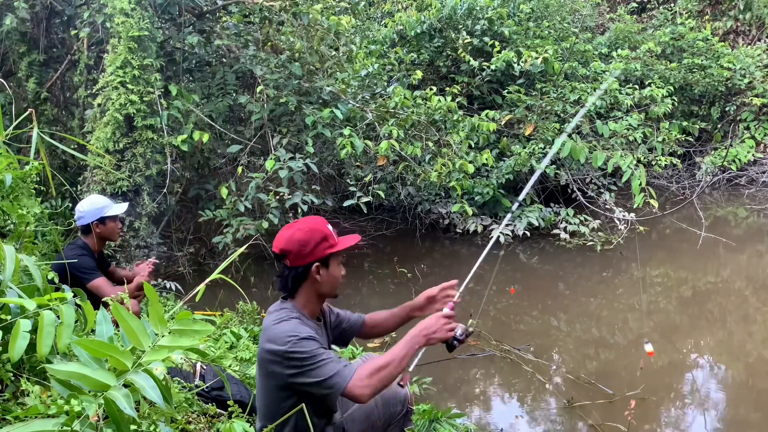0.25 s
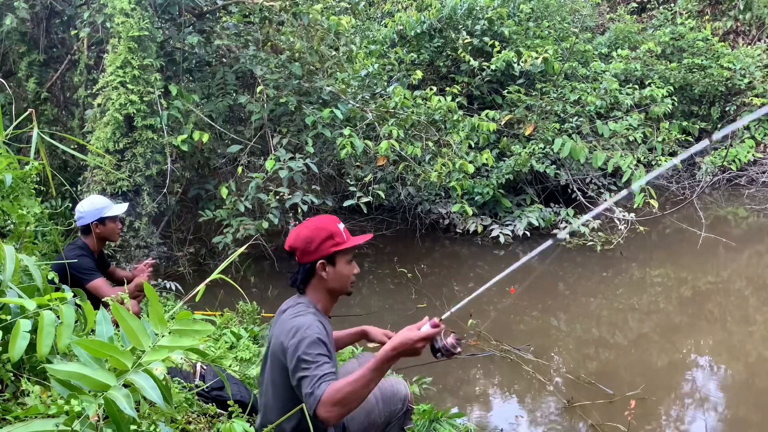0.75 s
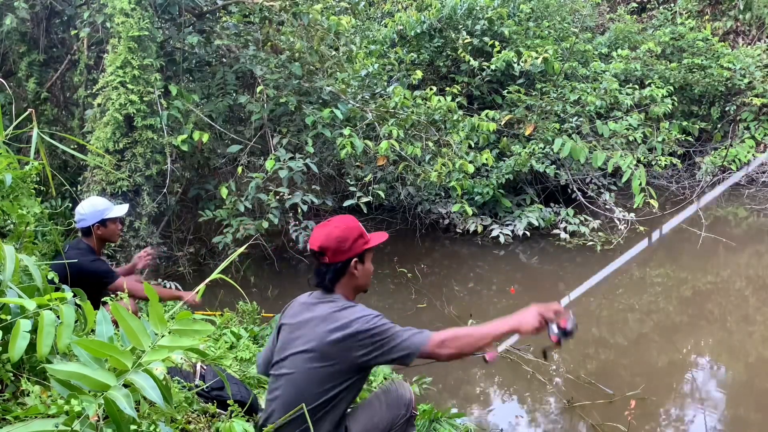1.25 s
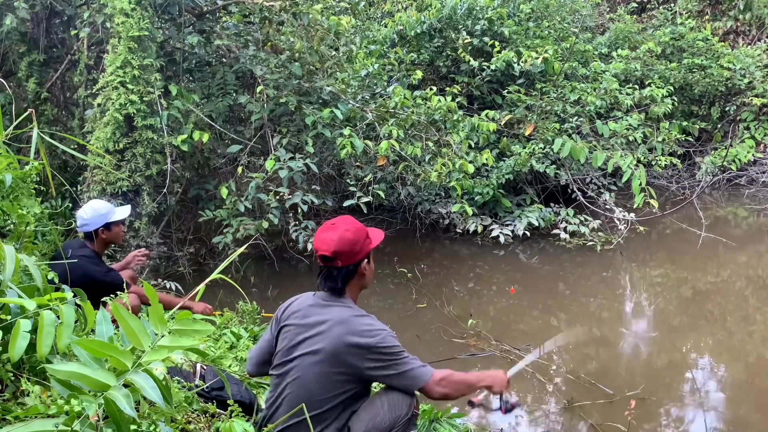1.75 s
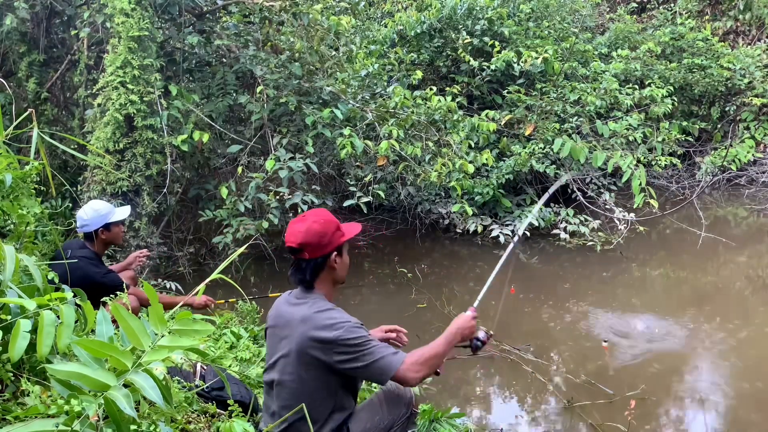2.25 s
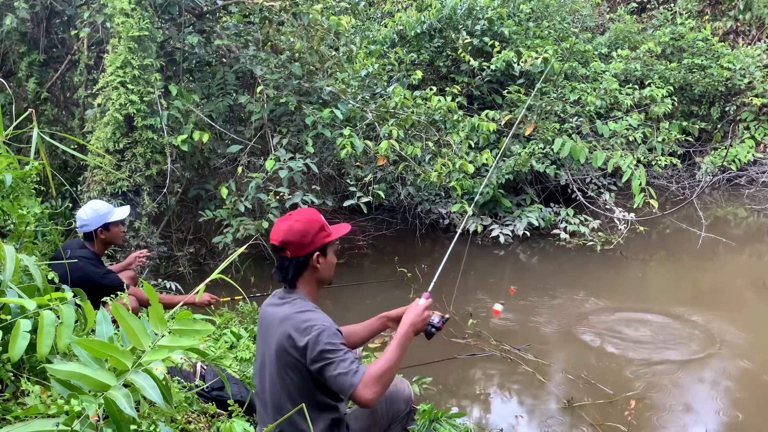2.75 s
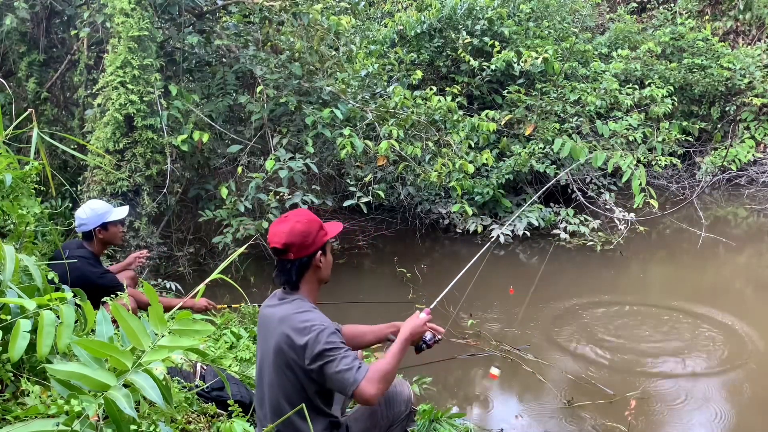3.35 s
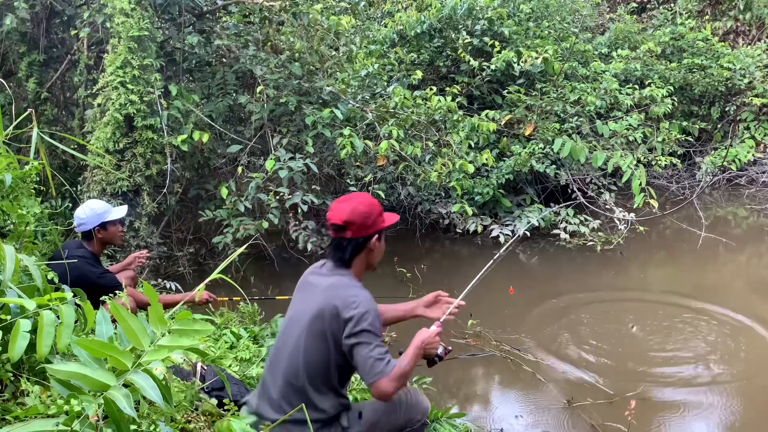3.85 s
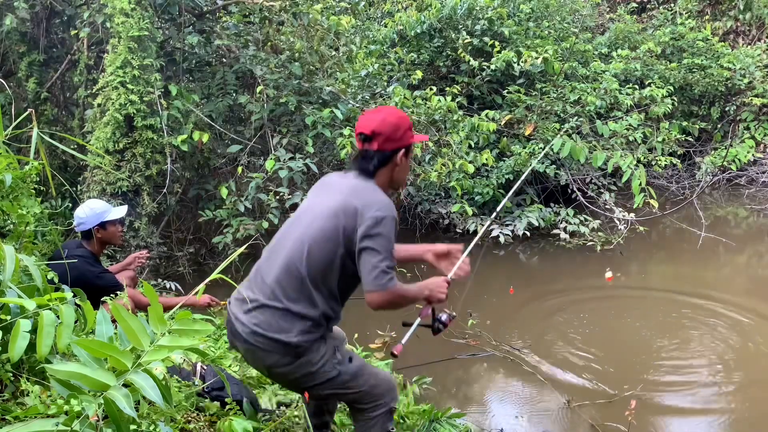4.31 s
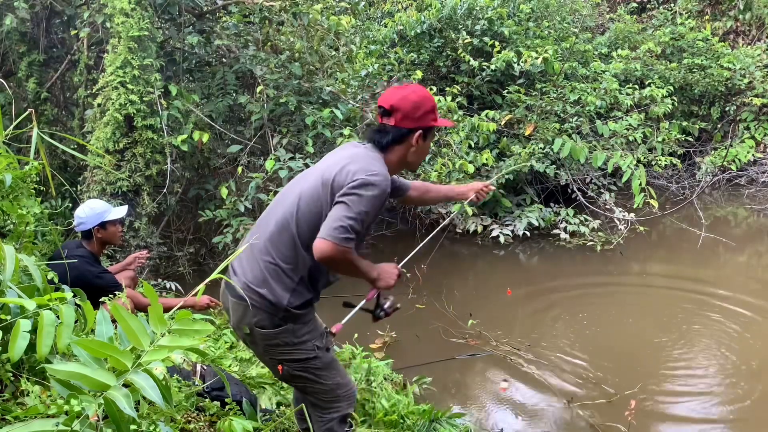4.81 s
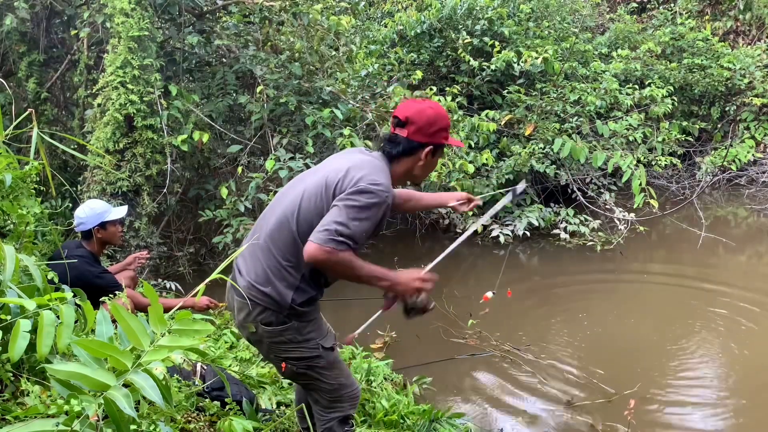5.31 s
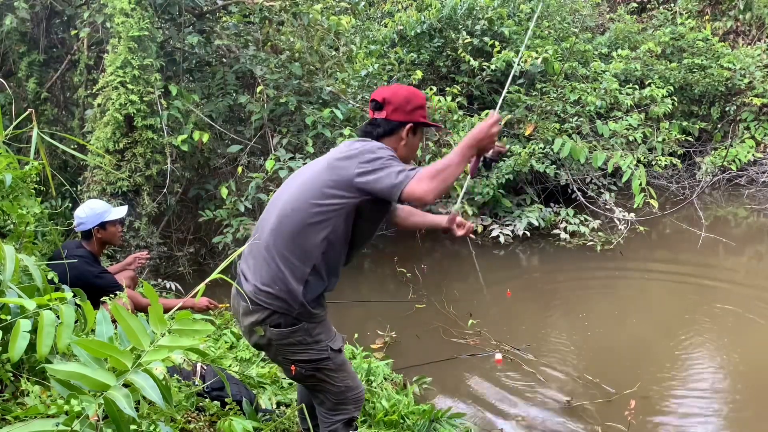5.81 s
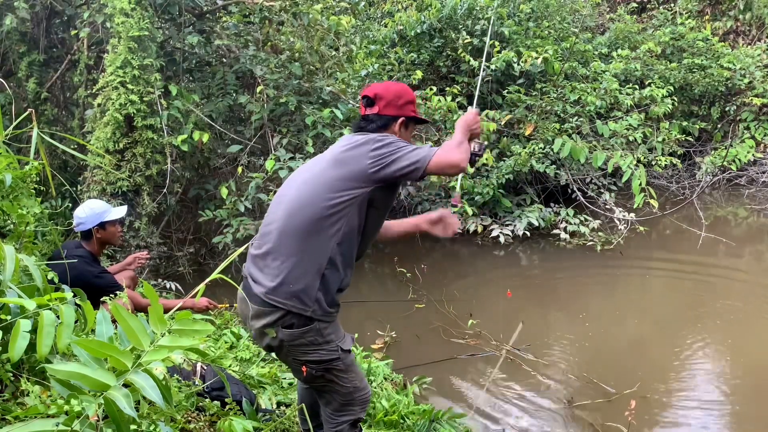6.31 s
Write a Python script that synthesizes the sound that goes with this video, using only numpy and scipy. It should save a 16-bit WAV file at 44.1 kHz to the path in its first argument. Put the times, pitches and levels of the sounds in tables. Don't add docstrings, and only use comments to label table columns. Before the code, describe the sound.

Steady tropical insect chorus and quick frog peeps surround a sharp lure slap, bubbling droplets, faint tackle clicks and a short cloth rustle.

```python
import sys
import numpy as np
from scipy import signal
from scipy.fft import rfft, irfft, next_fast_len
from scipy.io import wavfile

SR = 44100
rng = np.random.default_rng(int(sys.argv[2]) if len(sys.argv) > 2 else 0)


def unload_audio(sound):
    columns = np.transpose(np.atleast_2d(sound))
    steps = np.round(np.clip(columns, -1, 1) * 32767)
    wavfile.write(sys.argv[1], SR, steps.astype(np.int16))


def elevation(decibels):
    levels = np.asarray(decibels, float)
    return 10 ** (levels / 20)


N = 289737
TIME = np.arange(N) / SR


def level(x, db):
    return x * elevation(db) / np.sqrt(np.mean(x ** 2))


def colour(x, points):
    size = next_fast_len(x.shape[-1])
    hz = np.maximum(np.arange(size // 2 + 1) * SR / size, 1)
    f, db = np.transpose(points)
    gain = elevation(np.interp(np.log(hz), np.log(f), db))
    return irfft(rfft(x, size) * gain, size)[..., :x.shape[-1]]


def band(x, lo_hz, hi_hz):
    return signal.sosfilt(signal.butter(3, [lo_hz, hi_hz], "band", fs=SR, output="sos"), x)


def walk(rate):
    knots = 1.1 * rng.standard_normal(int(N / SR * rate) + 2)
    return np.interp(TIME * rate, np.arange(len(knots)), knots)


def wide(alike):
    mid, side = rng.standard_normal((2, N))
    return np.sqrt(1 + alike) * mid + np.sqrt(1 - alike) * side * np.array([[1], [-1]])


def add(out, s, sound, pan_db):
    i = max(int(s * SR), 0)
    n = min(len(sound), N - i)
    out[:, i:i + n] += sound[:n] * elevation(np.array([[pan_db], [-pan_db]]) / 2)


def late_left(x, count=5):
    return np.array([np.roll(x[0], count), x[1]])


def forest(x, t60, wet_db, alike=0.):
    t = np.arange(int(.5 * SR)) / SR
    build_up = np.minimum(t / 0.0093, 1)
    tail = wide(np.clip(alike, 0, 1))[:, :len(t)] * elevation(-60 * t / t60) * build_up
    tail = tail / np.linalg.norm(tail, axis=1)[:, None]
    size = next_fast_len(N + len(t))
    echo = irfft(rfft(x.mean(axis=0), size) * rfft(tail, size), size)[:, :N]
    return x + elevation(wet_db) * echo


# (pitch [Hz], level [dB])
KATYDID_COLOUR = [(3590, -46.5), (6100, -23), (6680, -2.5), (6810, 2), (7170, 4), (7380, 1), (8210, 1),
                  (8380, -6), (8800, -19), (9010, -30), (9200, -75), (12000, -95), (20200, -120)]


def katydids(count=3):
    out = 0.65 * late_left(wide(0.23), count=2)
    for rate, side in zip(rng.uniform(110, 330, 2 * count), np.arange(2 * count) % 2):
        teeth = (np.cumsum(rate * (1 + 0.065 * walk(15))) / SR) % 1
        out[side] += np.exp(-teeth / 0.28) * rng.standard_normal(N) * elevation(2.5 * walk(5.1))
    song = level(colour(out, KATYDID_COLOUR), -34.5) * elevation(np.array([[-.6], [.6]]))
    overtone = band(band(out, 12400, 15100), 12400, 15100)
    return song + level(overtone, -63.5)


# (pitch [Hz], level [dB])
AIR_COLOUR = [(21, -46), (35, -6), (50, 0), (92, -2.5), (300, -11), (1140, -21.5), (1420, -25.5),
              (1760, -6.5), (2230, -9.5), (2710, -5), (2950, -20), (3280, -40), (3600, -26), (4400, -22),
              (6000, -25.5)]


def air():
    rumble = wide(.8) * elevation(1.2 * walk(2.96))
    return level(colour(rumble, [*AIR_COLOUR, (7800, -54), (SR / 2, -120)]), -52.5)


# (first stroke [s], end [s], level [dB])
NEAR_PHRASES = [(0.003, 0.089, -35), (0.519, 0.853, -35.5), (1.285, 1.62, -34), (2.069, 2.434, -36),
                (3.235, 3.56, -35.5), (3.997, 4.345, -34.5), (4.7817, 5.106, -34), (5.5, 5.82, -34),
                (6.236, 6.567, -34.5)]


def near_cricket():
    out = np.zeros((2, N))
    effort = elevation(2.5 * walk(60))
    rate, hz, sag = 44.4, 6781, 0.068
    for start, end, db in NEAR_PHRASES:
        length = int(np.round((end - start) * rate + .5) / rate * SR)
        t = np.arange(length) / SR
        stroke = (t * rate) % 1
        loudness = np.interp(stroke, [0, .1, .4, .52, .64, 1], [0, 1.0, 0.79, 1.0, 0.17, 0.099])
        pitch = hz * (1 - sag * (stroke - .35) + .0028 * walk(44)[:len(t)])
        tone = np.sin(2 * np.pi * np.cumsum(pitch) / SR)
        add(out, start - 0.38 / rate, elevation(db + 4.0) * loudness * tone, .6)
    return out * effort


def chirper(phrases, duty, wobble):
    out = np.zeros(N)
    pace = 1 + wobble * walk(6)
    waver = 1 + 0.00394 * walk(40)
    for start, end, hz, rate, db in phrases:
        part = slice(int(start * SR), int(end * SR))
        stroke = (np.cumsum(rate * pace[part]) / SR) % 1
        pulse = np.sin(np.pi * np.minimum(stroke / duty, 1)) ** 2
        tone = np.sin(2 * np.pi * np.cumsum(hz * waver[part]) / SR)
        edge = np.clip(np.minimum(TIME[part] - start, end - TIME[part]) / 0.06, 0, 1)
        out[part] = edge * level(pulse * tone, db)
    return out


# (start [s], end [s], pitch [Hz], stroke rate [1/s], level [dB])
ANSWER_PHRASES = [(.08, .5, 6940, 66, -43), (.93, 1.26, 6930, 71, -45), (1.82, 2.1, 7030, 72, -46.5),
                  (2.62, 3.2, 7020, 61, -42), (3.56, 3.96, 7050, 62, -42), (4.38, 4.78, 7040, 81, -44),
                  (5.18, 5.5, 7030, 62, -45), (5.93, 6.25, 7040, 75, -46)]


def answering_cricket():
    return chirper(ANSWER_PHRASES, 0.93, 0.029) * elevation(np.array([[-1.1], [1.1]]))


# (start [s], end [s], pitch [Hz], stroke rate [1/s], level [dB])
FAR_PHRASES = [(.62, 1.12, 5720, 90.6, -58.5), (1.56, 2.0, 5440, 90, -57.5), (2.1, 2.62, 5740, 90, -55.5),
               (5.56, 6.12, 5750, 90, -59)]


def far_cricket():
    song = chirper(FAR_PHRASES, 0.66, 0.089) * elevation(3.3 * walk(14))
    return forest(song * np.ones((2, 1)), 0.66, 11.6) * elevation(-12.5)


def crickets():
    return forest(near_cricket() + answering_cricket() + far_cricket(), 0.24, -3.5)


def frog_calls(calls, hz, bend, climb_hz_s=0.):
    s, db = np.transpose(calls)
    return np.c_[s, db, hz + bend * (db + 33) + climb_hz_s * (s - N / SR / 2)]


def frog(calls, voice, low, high, rise, length, crest, throb=0.59):
    out = np.zeros((2, N))
    for (s, db, hz), luck in zip(calls, rng.standard_normal((len(calls), 3))):
        span = length * elevation(0.38 * (db + 33) + .8 * luck[0])
        t = np.arange(int(span * SR)) / SR
        sweep = high - (high - low) * np.exp(-t / (rise * span))
        phase = 2 * np.pi * np.cumsum(hz * sweep) / SR
        tone = sum(elevation(d) * np.sin(k * phase) for k, d in voice)
        flutter = 1 + throb * np.sin(2 * np.pi * 110 * elevation(2.47 * luck[1]) * t + 3 * luck[1])
        loudness = np.sin(np.pi / 2 * np.interp(t / span, [0, crest, 1], [0, 1, 0])) ** 1.55
        add(out, s - crest * span, elevation(db) * loudness * flutter * tone, 1.7 * luck[2] - 1.6)
    return out


def far_echo(x):
    return elevation(-11.5) * forest(x, 0.36, 12.7)


def with_late_echo(calls):
    return np.r_[calls, calls + [0.013, -5, 58]]


# (multiple of pitch, level [dB])
LOW_TONE = [
    (1, 1),
    (1.5, -13),
]
# (multiple of pitch, level [dB])
LOW_UPPER_TONE = [
    (2.005, -18),
]
# (time [s], level [dB])
DEEP_CALLS = [(.012, -34.5), (.163, -34), (.2, -35), (.399, -34.5), (.529, -31.5), (.79, -30.5),
              (.819, -36.5), (.962, -35), (1.099, -31.5), (1.213, -35.5), (1.358, -29.5), (1.589, -30),
              (1.627, -35), (1.953, -30), (2.117, -36), (2.29, -30), (2.497, -30.5), (2.734, -31.5),
              (2.879, -34.5), (3.042, -29), (3.241, -31), (3.425, -30), (3.599, -29), (4.012, -30),
              (4.365, -30.5), (4.733, -30), (5.437, -31), (5.754, -29.5), (6.058, -28), (6.394, -30)]
# (time [s], level [dB])
RIVAL_CALLS = [(.448, -43), (.732, -42.5), (1.764, -40.5), (1.999, -39), (2.017, -36.5), (2.134, -37),
               (2.349, -37), (2.36, -37), (2.458, -40), (2.476, -35), (2.677, -41.5), (2.695, -40.5),
               (2.711, -34.5), (3.198, -42), (3.292, -35.5), (3.304, -33.5), (3.726, -36.5), (3.834, -31),
               (3.922, -38.5), (3.949, -32.5), (4.116, -38), (4.163, -29.5), (4.455, -41), (4.472, -35),
               (4.55, -30), (4.599, -35), (4.612, -36), (4.828, -37), (4.883, -31), (5.066, -29),
               (5.249, -31.5), (5.335, -36), (5.483, -35), (5.584, -31.5), (5.627, -37), (5.661, -36),
               (5.827, -37), (5.898, -31), (5.942, -36.5), (6.202, -30.5), (6.468, -35.5), (6.486, -36.5),
               (6.539, -31)]


def low_frogs():
    low = np.r_[frog_calls(DEEP_CALLS, 1751, -2.5, 20.5), frog_calls(RIVAL_CALLS, 1829, -7)]
    near = frog(with_late_echo(low), LOW_TONE, 0.81, 1.1, 0.4064, .024, 0.41, throb=0.26)
    near = forest(near, 0.28, -5, alike=0.52)
    pouch = low * [1, 1, 0] + [0, 0, 1758]
    overtone = frog(pouch, LOW_UPPER_TONE, .92, 1.12, 0.587, .03, .45)
    overtone = overtone * elevation(-5.0 + 1.73 * TIME + 5.1 * walk(200))
    return late_left(near, count=3) * elevation(0.52) + far_echo(overtone)


# (multiple of pitch, level [dB])
HIGH_TONE = [
    (0.97, 1.5),
    (.5, -27),
]
# (time [s], level [dB])
FIRST_NOTES = [(.164, -44.5), (.301, -43), (.4, -41), (.553, -43.5), (.709, -35.5), (.817, -37.5),
               (.961, -37), (1.209, -35.5), (1.517, -33.5), (1.905, -36), (2.249, -34), (2.616, -35),
               (2.947, -35), (3.208, -36.5), (3.484, -33), (3.819, -33), (4.067, -35), (5.232, -30),
               (5.512, -37), (5.562, -33.5), (6.136, -34.5)]
# (time [s], level [dB])
MIDDLE_NOTES = [(1.111, -33), (1.35, -33.5), (1.623, -35.5), (1.729, -34.5), (1.993, -32), (2.112, -35),
                (2.343, -31.5), (2.468, -31.5), (2.703, -29.5), (2.874, -32.5), (3.289, -32.5),
                (3.588, -31.5), (3.759, -36.5), (3.933, -31.5), (4.357, -36), (4.463, -28), (4.541, -33),
                (4.606, -31), (4.922, -36.5), (5.067, -35.5), (5.469, -33), (5.882, -35), (5.931, -28),
                (6.052, -38), (6.078, -34), (6.1, -38.5), (6.19, -32.5), (6.215, -32), (6.3, -35.5),
                (6.34, -37.5), (6.469, -35), (6.5, -34.5)]
# (time [s], level [dB])
TOP_NOTES = [(.029, -41.5), (.07, -40), (.359, -38.5), (.641, -40), (.858, -40), (.976, -39), (3.056, -26),
             (3.402, -28.5), (3.714, -26), (4.178, -27), (4.873, -25), (5.269, -35.5), (5.317, -26),
             (5.604, -33), (5.648, -26), (5.684, -42.5), (6.249, -25), (6.262, -29), (6.54, -32)]


def high_frog():
    high = np.r_[frog_calls(FIRST_NOTES, 2619, 7.9),
                 frog_calls(MIDDLE_NOTES, 2683, 8.7, 12.5),
                 frog_calls(TOP_NOTES, 2903, -5.5)]
    near = frog(high, HIGH_TONE, .91, 1.1, 0.763, .018, .66, throb=0.16)
    return late_left(forest(near, 0.19, 0.26)) * elevation(3.46)


# (time [s], low kind level [dB], high kind level [dB])
FAR_CHORUS = [
    (0.0, -54.5, -47.5),
    (1.502, -55, -56),
    (6.57, -49.5, -43.5),
]


def far_frogs():
    out = np.zeros((2, N))
    s, low_db, high_db = np.transpose(FAR_CHORUS)
    for voice, hz, db in ((LOW_TONE, 2020, low_db), (HIGH_TONE, 2780, high_db)):
        when, size, pitch = rng.random((120, 3)).T
        when = when * N / SR
        calls = np.c_[when, np.interp(when, s, db) + 15 - 9 * size, hz * (.88 + .22 * pitch)]
        out += frog(calls, voice, .9, 1.07, 0.591, .026, .55)
    return far_echo(out)


# (time [s], pitch [Hz], level [dB])
LINE_HUM = [
    (1.13, 590, -67),
    (1.21, 560, -58),
    (1.26, 564, -70),
    (1.33, 540, -64),
    (1.4, 570, -53),
    (1.48, 545, -64),
]


def line():
    s, hz, db = np.transpose(LINE_HUM)
    phase = 2 * np.pi * np.cumsum(np.interp(TIME, s, hz)) / SR
    gate = np.clip(np.minimum(TIME - s[0], s[-1] - TIME) / 0.018, 0, 1)
    loudness = elevation(np.interp(TIME, s, db) - 1.5 + 3.8 * walk(25.7))
    return gate * loudness * (np.sin(phase) + 0.5 * np.sin(phase / 2))


# (time [s], treble peak [dB], middle over treble [dB], 60 dB fade
# [s])
HARD_KNOCKS = [
    (1.7251, -17.5, -15, 0.024),
    (1.7264, -6.5, -26.5, 0.011),
    (1.4, -53, -8, 0.014),
               (1.1433, -44, -8, 0.047), (1.284, -34, -8, 0.017), (1.4466, -34.5, -4.5, 0.069),
               (1.5117, -29, -30, 0.064), (1.7263, -12.5, -16, 0.11), (1.793, -35.5, -6.5, 0.097),
               (1.9674, -32, -17, 0.1), (2.0514, -42, -14, 0.06), (2.15, -46, -3, 0.052),
               (2.1867, -33, -9, 0.066), (2.2236, -36, -10, 0.089), (2.2884, -30.5, -7.5, 0.084),
               (2.3614, -45.5, 9.5, 0.04), (2.536, -26.5, -27, 0.05), (3.7268, -55.5, 24.5, 0.015),
               (3.7787, -56, 20, .02), (3.84, -54, 21, .02), (3.9348, -66, 10, .02), (4.098, -55, -8, 0.05),
               (4.6149, -48, -7, 0.05), (6.1489, -52, 9, 0.06), (6.1997, -24, -26, 0.062),
               (6.346, -39, -14, 0.06), (6.363, -27, -17, 0.054)]


def ticks():
    treble, middle = np.zeros((2, 2, N))
    t = np.arange(int(.15 * SR)) / SR
    for s, db, middle_db, t60 in HARD_KNOCKS:
        crack = 0.5 * np.exp(-t / 0.00024)
        tail = 0.25 * elevation(-60 * t / max(t60, .01))
        burst = 1.6 * (t == 0) + rng.standard_normal(len(t)) * (crack + tail)
        add(treble, s, elevation(db + 7.5) * burst, -8)
        add(middle, s, elevation(db + middle_db + 16.0) * burst, -7)
    return late_left(band(treble, 6600, 15700) + band(middle, 660, 6300))


def swell(start, length, rise, hold, fade_db):
    share = (TIME - start) / length
    edge = np.clip(np.minimum(share / rise, (1 - share) * length / 0.016), 0, 1)
    return edge * elevation(fade_db * np.clip((share - hold) / (1 - hold), 0, 1))


def grains(gains):
    size_db = 2.3 * np.minimum(rng.exponential(size=N), 6) + 2.85 * walk(45)
    noise = wide(0.17) * elevation(size_db)
    ranges = ((8650, 12940, 5.5), (2460, 5320, 8.2), (226, 2500, 1.2))
    return sum(g * level(band(noise, lo, hi), db) for g, (lo, hi, db) in zip(gains, ranges))


# (start [s], length [s], treble [dB], middle [dB], low [dB])
MOVEMENTS = [(1.15, 0.11, -68, -59.5, -61.5), (1.275, 0.23, -73, -63, -58), (1.43, 0.19, -61, -63.5, -66),
             (3.749, 0.33, -50, -50, -47.5), (4.088, 0.11, -63, -60, -61), (4.582, 0.073, -67, -74, -82),
             (4.79, 0.18, -56, -55.5, -67), (5.25, 0.11, -97, -58.5, -80)]


def rustle():
    return grains(sum(elevation(np.c_[db]) * swell(s, length, 0.16, 0.54, -11)
                      for s, length, *db in MOVEMENTS))


# (time [s], peak [dB], pitch [Hz], 60 dB fade [s])
BUBBLE_RINGS = [(1.449, -49, 550, 0.073), (1.727, -37.5, 120, 0.094), (1.726, -22, 294, 0.015),
                (1.74, -21.5, 782, 0.046), (1.759, -35, 1350, 0.056), (1.794, -34, 490, 0.044),
                (1.809, -43, 447, 0.044), (1.988, -28.5, 1440, 0.042), (2.002, -45.5, 576, 0.086),
                (2.048, -34, 588.5, 0.17), (2.067, -32, 613, 0.07), (2.089, -37.5, 537, 0.07),
                (2.1, -33, 758, 0.056), (2.119, -32.5, 1150, 0.041), (2.139, -49, 970, 0.044),
                (2.163, -38, 720, 0.035), (2.174, -35.5, 1210, 0.042), (2.204, -48, 1120, 0.05),
                (2.229, -57, 1140, 0.056), (2.258, -47, 1200, 0.065), (2.285, -23.5, 1240, 0.023),
                (2.364, -36.5, 790, 0.014), (2.365, -34, 1250, 0.016), (2.615, -28, 1150, 0.011),
                (2.617, -32, 850, 0.017), (2.626, -35.5, 1006, .025), (2.634, -33.5, 680, 0.062)]
# (start [s], end [s], lowest pitch [Hz], highest pitch [Hz], peak [dB])
DROPLET_PATTER = (2, 2.5, 650, 1806, -46.5)


def water(count=90):
    out = np.zeros((2, N))
    t = np.arange(int(.2 * SR)) / SR
    start, end, lo_hz, hi_hz, top_db = DROPLET_PATTER
    when, size, pitch = rng.random((count, 3)).T
    patter = np.c_[start + (end - start) * when, top_db + 2.5 - 9 * size,
                   lo_hz * (hi_hz / lo_hz) ** pitch, .03 + .03 * size]
    for s, db, hz, t60 in [*BUBBLE_RINGS, *patter]:
        ring = np.sin(2 * np.pi * np.cumsum(hz * (.94 + 5 * t)) / SR) * np.minimum(t / 0.0026, 1)
        add(out, s - .001, elevation(db + 3.0 - 60 * t / max(t60, .01)) * ring, -3.5)
    return late_left(forest(out, 0.28, -10.0))


# (start [s], length [s], treble [dB], step to each lower range [dB])
SPLASHES = [
    (1.725, 0.16, -33.5, -12.5),
    (1.974, 0.39, -51, -6),
    (2.157, 0.36, -56, -5),
    (2.287, 0.095, -47.5, -3.5),
    (2.541, 0.07, -49, -11),
    (6.213, 0.15, -48.5, -9),
    (6.346, 0.056, -41.5, -14),
]


def spray():
    return grains(sum(elevation(db + step_db * np.c_[0:3]) * swell(s, length, 0.092, 0.092, -25)
                      for s, length, db, step_db in SPLASHES))


def scene():
    wildlife = katydids() + crickets() + low_frogs() + high_frog() + far_frogs()
    fishing = line() + ticks() + rustle() + water() + spray()
    return wildlife + air() + fishing


def top_cut(x):
    return signal.sosfilt(signal.butter(12, 16400, fs=SR, output="sos"), x)


# (pitch [Hz], level [dB])
TREBLE_COLOUR = [(20, 0), (8600, 0), (9100, -7), (10400, 4), (11800, -19), (12800, 2.5), (14300, -3),
                 (15300, -14)]


def record(dry):
    heard = colour(np.clip(dry, -1.1, 1.1), [*TREBLE_COLOUR, (16500, -63.0)])
    return top_cut(np.clip(heard, -1, 1))


dry = scene()
out = record(dry)
unload_audio(out)
```